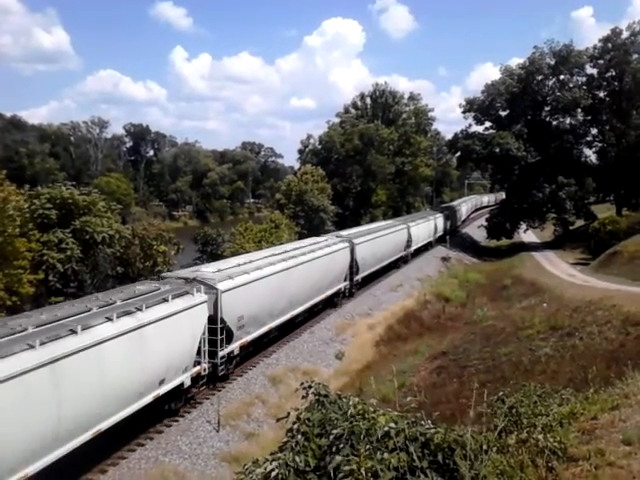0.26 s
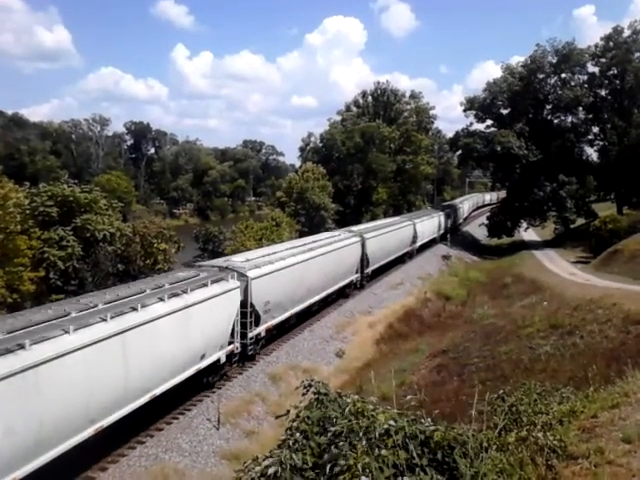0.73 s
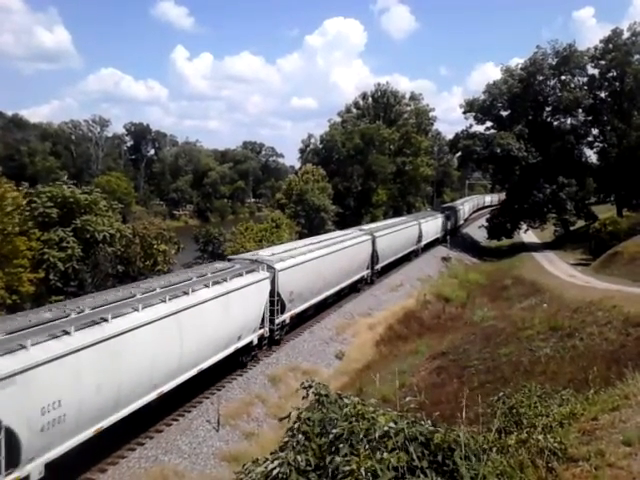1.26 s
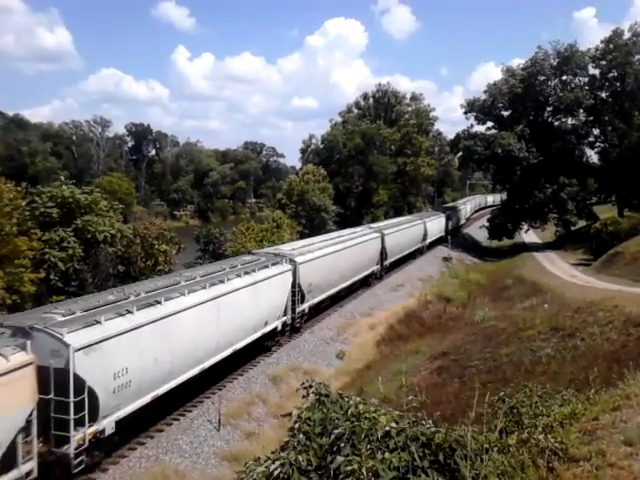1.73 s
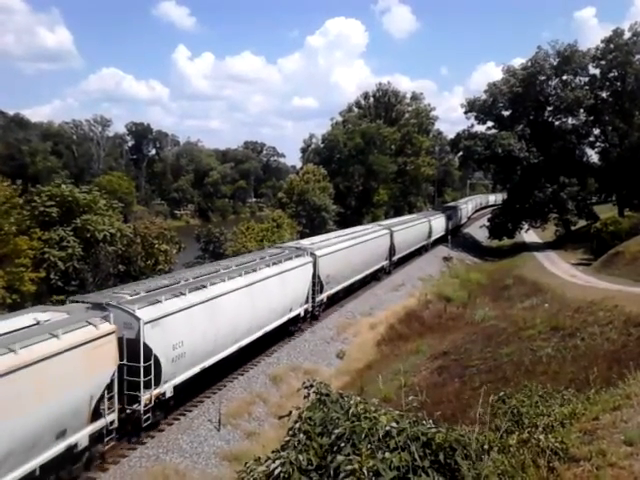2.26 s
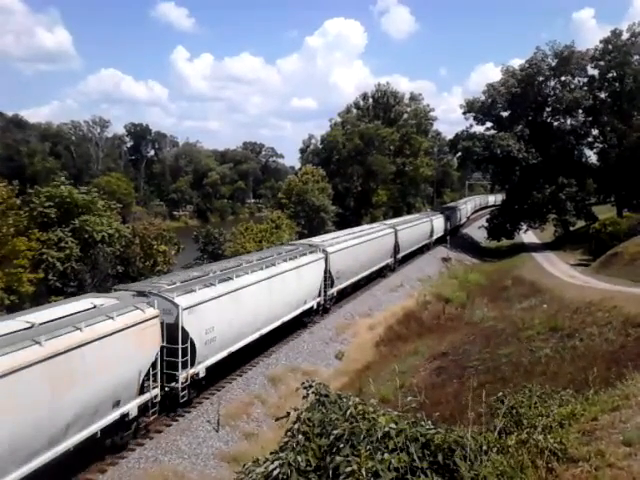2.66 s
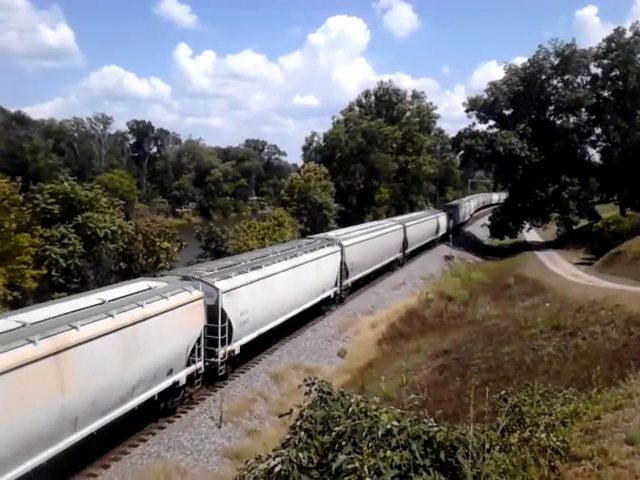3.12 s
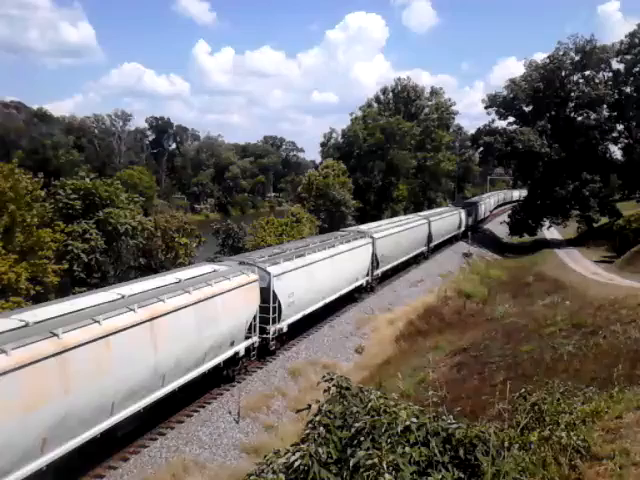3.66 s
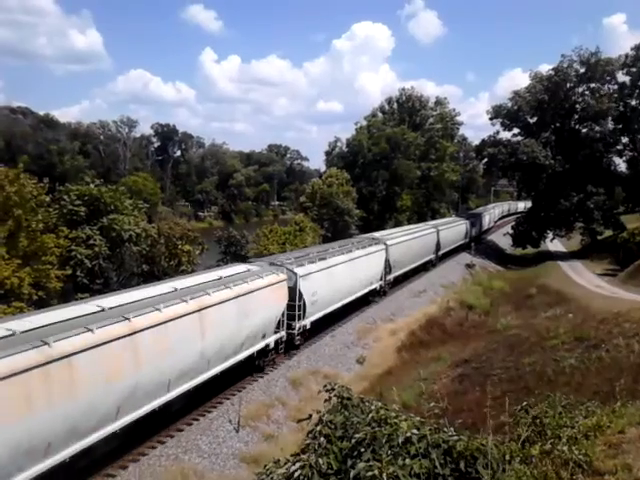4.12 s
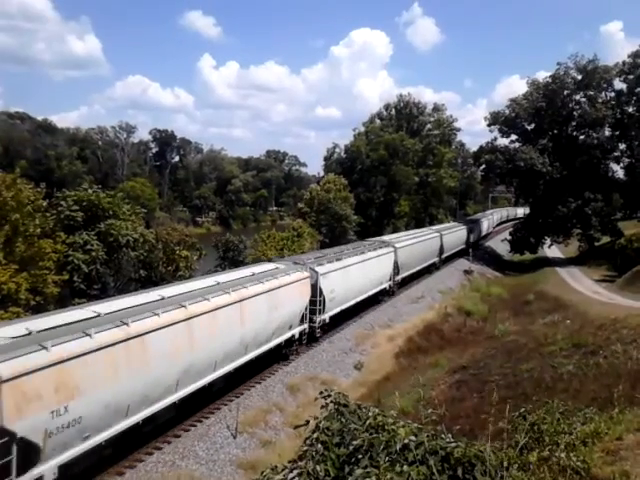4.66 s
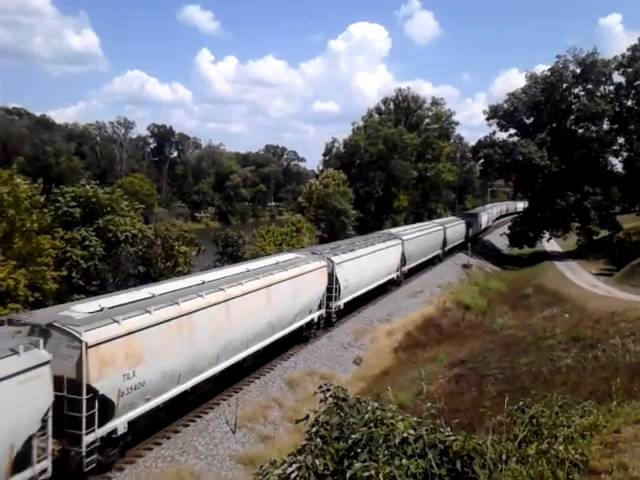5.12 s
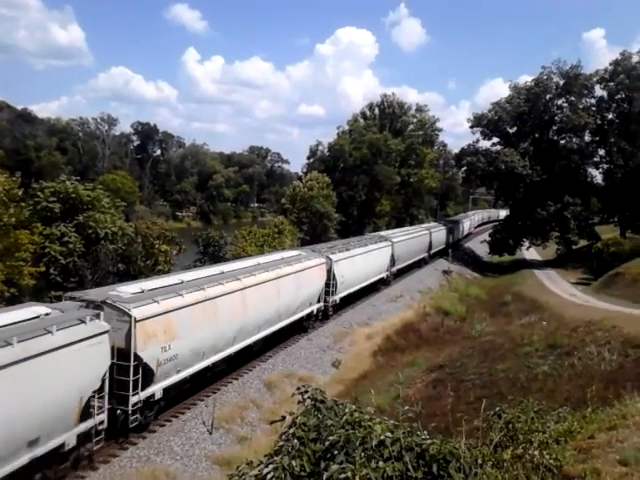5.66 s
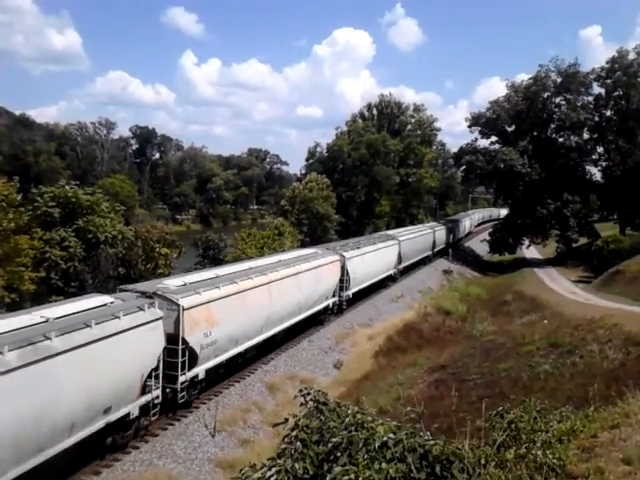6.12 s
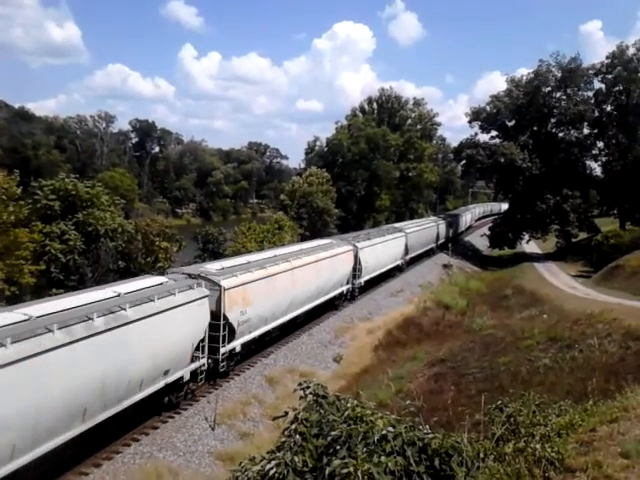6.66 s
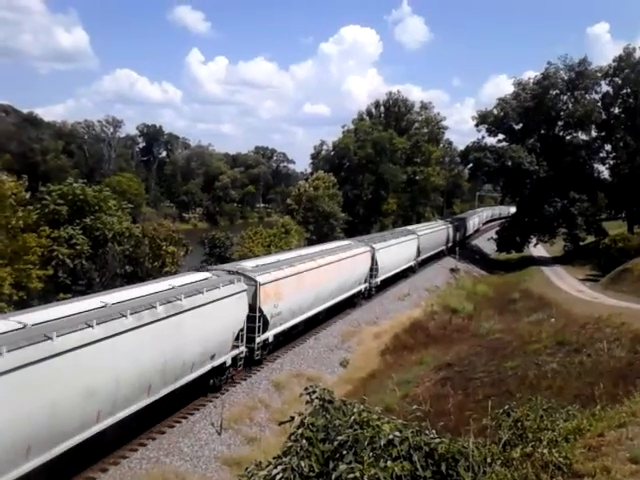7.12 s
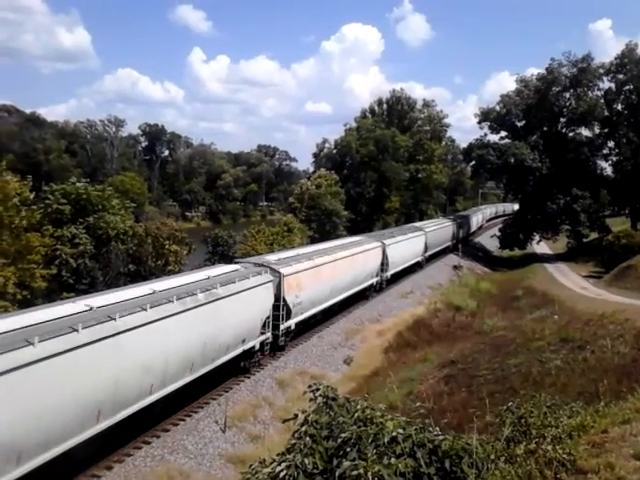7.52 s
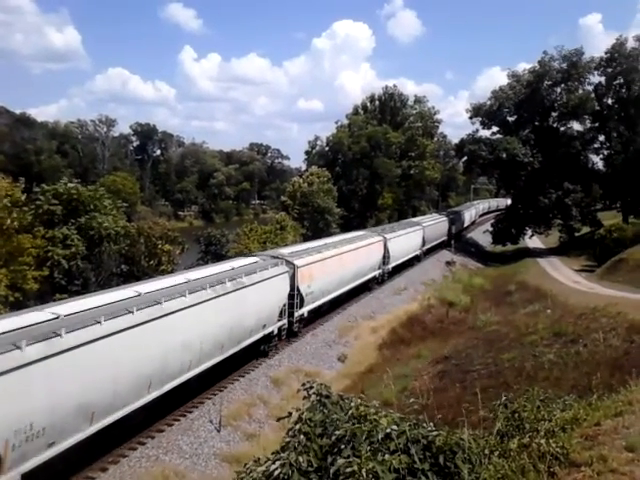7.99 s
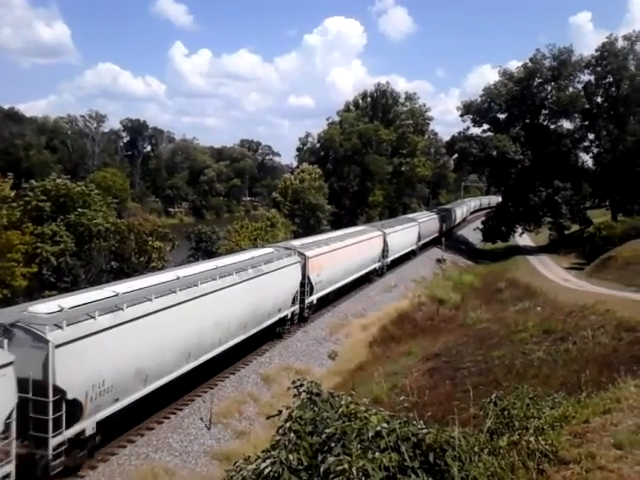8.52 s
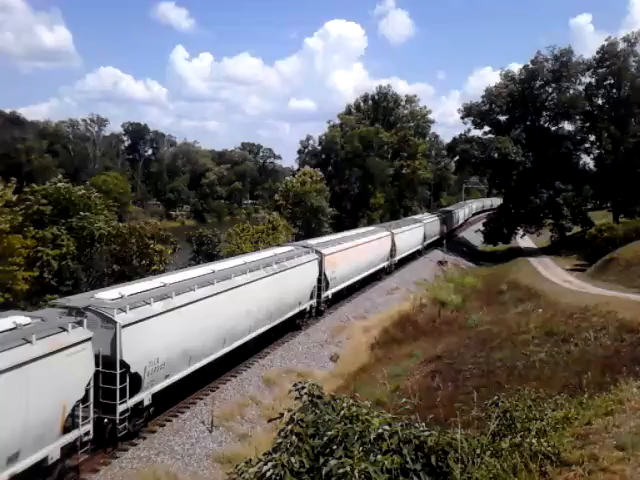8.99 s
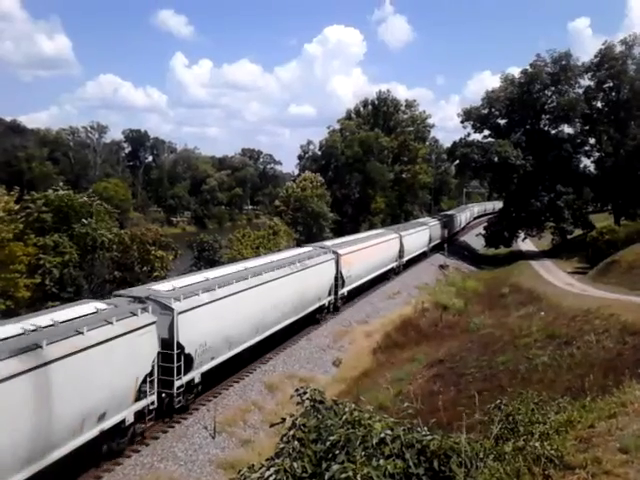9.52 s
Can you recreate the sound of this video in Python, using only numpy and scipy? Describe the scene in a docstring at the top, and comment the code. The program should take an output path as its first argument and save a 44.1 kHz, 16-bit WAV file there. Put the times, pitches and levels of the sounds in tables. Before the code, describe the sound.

Outdoors beside a curved track, a long freight train passes steadily. Wheel flanges scrape the rail in rough bursts, with thin gliding squeals ringing inside the grinding. Beneath runs a low hollow boom, swelling about every two seconds, and a constant roar of wheels. Midway, wind thumps the microphone; later the screeching grows loudest, then falls away. The sound is narrow-band and slightly harsh.

```python
"""Wheel flanges grind on the rail in bursts as a freight train of covered hoppers rolls round a curve.
Friction noise rings the steel wheels, and now and then one mode locks into a gliding squeal.
Underneath, shaped noise makes a low boom that swells regularly, and the steady roar of the trucks.
Half way through, a gust buffets the microphone with single thumps; a shorter gust follows later.
A narrow-band recorder mirrors a little treble upwards and clips the highest peaks."""
import sys
import numpy as np
from scipy import signal
from scipy.fft import rfft, irfft, next_fast_len
from scipy.io import wavfile
from scipy.ndimage import uniform_filter1d, map_coordinates

SR = 44100
rng = np.random.default_rng(int(sys.argv[2]) if len(sys.argv) > 2 else 0)


def persist_wave(psi):
    """Save psi, clipped to +-1, as 16-bit WAV."""
    counts = np.round(np.clip(psi, -1, 1) * 32767).astype(np.int16)
    wavfile.write(sys.argv[1], SR, np.atleast_2d(counts).T)


N = 430416  # length in samples

# Bites of a flange into the rail. Each row: start in seconds, end in seconds, attack in seconds,
# first level in dB, last level in dB, treble share of the power in dB,
# nominal squeal of the main wheel mode in dB relative to the mean of the two levels.
BITES = [(0, .453, 0.0085, -20.5, -20, -3.5, -7.5), (0.458, .922, 0.11, -16.5, -20.5, -2.5, -8),
         (1.214, 1.738, 0.14, -13.5, -17, -2.5, -9.5), (1.914, 2.424, 0.12, -24.5, -31.5, -3, -13.5),
         (2.585, 2.815, 0.021, -18.5, -20.5, -5.5, -3.5), (3.234, 3.813, 0.15, -18.5, -25.5, -2.5, -19),
         (3.82, 4.102, .08, -19.5, -22.8, -3.2, -16), (4.306, 4.576, .145, -22, -21, -1.5, -15.5),
         (4.594, 4.94, .054, -18.5, -19.5, -2, -15), (5.681, 6.062, .23, -17.5, -15, -3.9, -12),
         (6.071, 6.912, .05, -18.5, -16, -4, -12.5), (6.904, 7.08, 0.063, -11, -17, -3.5, -3.5),
         (7.52, 8.288, .08, -14, -13.5, -4, -4), (8.27, 9.062, 0.11, -12, -11, -3, -17),
         (9.088, 9.498, .06, -18, -21, -4, -11.5)]
# Modes of the steel wheels. Each row: frequency in Hz, width in Hz, relative level in dB.
WHEEL_MODES = [(979, 31, -7.5), (1090, 36, -10.5), (1587, 26, -8), (1778, 9.7, -4), (1948, 72, -5.5),
               (2210, 33.5, 4), (2599, 33, -1), (2760, 51, 1), (3557, 52, -6.5), (3848, 55, -3.5),
               (4528, 68, 2.5), (5493, 87, -2), (6450, 39, -1)]


def amp(db):
    """Decibels to gain."""
    return 10 ** (np.asarray(db) / 20)


def unit(x):
    """Scale to rms 1."""
    return x / np.sqrt(np.mean(np.abs(x) ** 2) + 1e-20)


def along(points, hz):
    """Gain at hz, read between (Hz, dB) points on a log frequency axis."""
    point_hz, point_db = np.transpose(points)
    return amp(np.interp(np.log(hz + 1), np.log(point_hz + 1), point_db))


def curves(rows):
    """One value per sample for each column after the time in seconds."""
    seconds, *columns = np.transpose(rows)
    return [np.interp(np.arange(N) / SR, seconds, column) for column in columns]


def wobble(rate, size=N):
    """A smooth random curve through rate knots a second."""
    knots = rng.standard_normal(int(size * rate / SR) + 4)
    coarse = np.arange(0, size + 32, 32)  # every 32nd sample is enough for a slow curve
    values = map_coordinates(knots, [coarse * rate / SR], mode="mirror")
    return np.interp(np.arange(size), coarse, values)


def filtered(x, response):
    """Filter x by a gain that is a function of frequency."""
    m = next_fast_len(N + SR // 4)
    return irfft(rfft(x, m) * response(np.fft.rfftfreq(m, 1 / SR)), m)[:N]


def rush(spectrum, patchy_db):
    """Coloured noise of rms 1, patchy in time and frequency."""
    bins = signal.stft(rng.standard_normal(N), nperseg=2048)[2]
    patches = uniform_filter1d(rng.standard_normal(bins.shape), size=2, axis=0)
    patches = uniform_filter1d(patches, size=6, axis=1)
    noise = signal.istft(bins * amp(patchy_db * unit(patches)), nperseg=2048)[1][:N]
    return unit(filtered(noise, lambda hz: along(spectrum, hz)))


def ringing(modes, swell_db, drift):
    """Modes shaken by friction; each swells and drifts on its own as the contact patch wanders."""
    out = np.zeros(N)
    for hz, width, db in modes:
        radius = np.exp(-np.pi * abs(width) / SR)
        poles = [1, -2 * radius * np.cos(2 * np.pi * hz / SR), radius * radius]
        ring = signal.lfilter([1, 0, -1], poles, rng.standard_normal(N))
        # reading the ring at a wandering speed makes its pitch drift
        read_at = np.arange(N) + np.cumsum(drift * wobble(4))
        ring = np.interp(read_at, np.arange(N), ring)
        out += amp(db + swell_db * wobble(5)) * np.sqrt(abs(width)) * unit(ring)
    return unit(out)


def flange_power():
    """Friction power and its treble share: each bite swells, drifts and lets go, over light rubbing."""
    # Light rubbing of all the other wheels. Each row: time in seconds, level in dB.
    rub = [(0, -29.5), (3, -29.2), (4.3, -25.5), (5.5, -27), (7.3, -32.5), (9.76, -37.5)]
    rub_treble_db, release_db_per_s = -2, 110
    t = np.arange(N) / SR
    power = amp(curves(rub)[0]) ** 2
    treble = power * amp(rub_treble_db) ** 2
    for start, end, attack, first_db, last_db, treble_db, _ in BITES:
        level_db = np.interp(t, [start, end], [first_db, last_db])
        level_db = level_db - release_db_per_s * np.clip(t - end, 0, 1)
        bite = (np.clip((t - start) / attack, 0, 1) * amp(level_db)) ** 2
        power = power + bite
        treble = treble + bite * amp(treble_db) ** 2
    return power, treble / power


def grinding(power, treble_share, squeal):
    """Flanges scrape the rail head: raw friction plus ringing wheels, juddering as they grip and slip."""
    # Smooth part of the friction noise. Each row: frequency in Hz, relative density in dB per Hz.
    friction = [(300, -27.5), (600, -20.5), (850, -15.5), (1050, -12), (1300, -9.5), (1600, -6),
                (1900, 0.5), (2400, -2.5), (3000, -1), (4150, -3.5), (5300, -2.5), (6000, -5.5), (6500, -3),
                (7000, -13), (9000, -13)]
    raw = rush(friction, patchy_db=3.5)
    scrape = unit(raw + amp(-2.5) * ringing(WHEEL_MODES, swell_db=2.0, drift=.002))
    # split at 3200 Hz and rebalance as the treble share moves
    low = filtered(scrape, lambda hz: 1 / (1 + (hz / 3200) ** 8))
    high = scrape - low
    treble_share = np.clip(treble_share, .02, .95)
    low_part = np.sqrt(1 - treble_share) * unit(low) * amp(-0.88)
    scrape = low_part + np.sqrt(treble_share) * unit(high) * amp(0.25)
    # a locked mode takes its power out of the broad friction noise, half of it at most
    taken = uniform_filter1d(squeal ** 2, size=SR // 8) / power
    judder = amp(0.49 * wobble(22))
    return judder * np.sqrt(power * np.clip(1 - taken, .5, 1)) * scrape


def main_squeals():
    """Every bite sets off the main wheel mode, half way through its attack; harder squeals are flatter."""
    main_hz, at_db, flatter_hz_per_db, glide_hz = 2249, -26, 3.5, -20  # main_hz is the pitch at at_db
    rows = []
    for start, end, attack, first_db, last_db, _, squeal_db in BITES:
        db = (first_db + last_db) / 2 + squeal_db
        hz = main_hz - flatter_hz_per_db * (db - at_db)
        rows.append((start + attack / 2, end, hz, glide_hz, db))
    return rows


def faint_squeals(power):
    """Other wheels catch briefly on one of their modes, louder while the grinding is loud."""
    count, mean_s, faint_db = 26, .3, -15.5  # faint_db is relative to grinding and mode level
    detune = .008  # largest mistuning from wheel to wheel, and largest glide, as a fraction of the pitch
    rows = []
    for k, (when, which, length, tune, bend) in enumerate(rng.random((count, 5))):
        # one squeal at a random moment in each equal slice of time
        start = (k + when) / count * (N - 1) / SR
        end = start + mean_s * (.5 + length)
        mode_hz, _, mode_db = WHEEL_MODES[int(which * len(WHEEL_MODES))]
        hz = mode_hz * (1 + detune * (2 * tune - 1))
        glide_hz = mode_hz * detune * (2 * bend - 1)
        grind_db = 10 * np.log10(power[int(start * SR):int(end * SR)].mean())
        rows.append((start, end, hz, glide_hz, grind_db + mode_db + faint_db))
    return rows


def squeals(rows):
    """Tones build, glide steadily in pitch and ring out, rough from slip and moving-car scatter."""
    attack_s, t60_s = 0.029, 0.5  # build-up time constant, and time to ring down by 60 dB
    out = np.zeros(N + SR)
    for start, end, hz, glide_hz, db in rows:
        held_s = end - start
        n = int(held_s * SR) + SR // 2
        t = np.arange(n) / SR
        ring_out = amp(-60 * np.maximum(t - held_s, 0) / t60_s)
        swell = (1 - np.exp(-t / attack_s)) * ring_out
        # a loud tone is firmly locked; a weak one slips about
        slip_hz = np.interp(db, [-30, -16], [30, 10])
        pitch = np.interp(t, [0, held_s], [hz, hz + glide_hz])
        pitch = pitch + slip_hz * wobble(149.3, size=n) + 4 * wobble(12.24, size=n)
        scatter = 1 + .62 * (wobble(60, size=n) + 1j * wobble(60, size=n))
        tone = unit(np.real(scatter * np.exp(2j * np.pi * np.cumsum(pitch) / SR)))
        out[max(0, round(start * SR)):][:n] += amp(db - 1.9) * swell * tone
    return out[:N]


def rolling():
    """Hollow car bodies boom, swelling at regular intervals, over the steady roar of the trucks."""
    # Colour of the boom. Each row: frequency in Hz, relative density in dB per Hz.
    boom_colour = [(15, -29.5), (30, -10), (55, -7.5), (72, -5), (83, 2.5), (100, -6), (150, -13),
                   (205, -9), (260, -16.5), (500, -30.5), (1000, -46.5)]
    # Colour of the truck roar. Each row: frequency in Hz, relative density in dB per Hz.
    truck_colour = [(100, -27.5), (220, -7.5), (340, 0), (520, -5), (750, -5), (950, -6), (1400, -7),
                    (2500, -16.5), (7000, -17)]
    boom_db, swell_db = -33.5, 3.5
    first_s, every_s, width_s = .04, 1.91, 0.069  # timing of the swells
    from_swell = (np.arange(N) / SR - first_s + every_s / 2) % every_s - every_s / 2
    level_db = boom_db + swell_db * np.exp(-(from_swell / width_s) ** 2)
    boom = amp(level_db + 1.3 * wobble(7)) * rush(boom_colour, patchy_db=1.0)
    roar = amp(-34.0 + 0.57 * wobble(7.6)) * rush(truck_colour, patchy_db=3.0)
    return boom + roar


def wind():
    """Lumpy buffeting, with single eddies that push and pull the diaphragm and quickly die away."""
    # Gusts on the microphone. Each row: peak time in seconds, half width in seconds, level in dB.
    gust_rows = [(4.7, 0.47, -29.5), (8.0, .23, -30.5)]
    # Colour of the buffeting. Each row: frequency in Hz, relative density in dB per Hz.
    buffet_colour = [(12, -14), (40, 5), (120, -2.5), (200, -1), (350, -19), (700, -22), (1500, -49)]
    # Eddies that thump the microphone. Each row: start in seconds, peak in dB, nominal frequency in Hz.
    thumps = [(3.052, -18.5, 133), (4.472, -13, 119), (4.53, -13, 190), (4.616, -8.5, 260),
              (4.643, -17, 108), (4.652, -7, 170), (4.742, -7.5, 176), (4.75, -11, 130), (5.062, -8.5, 187)]
    breeze_db = -50  # the air between the gusts
    t = np.arange(N) / SR
    gusts = sum(amp(db) * np.exp(-((t - s) / width) ** 2) for s, width, db in gust_rows)
    level = np.hypot(amp(breeze_db), gusts)
    out = level * amp(2.2 * wobble(22)) * rush(buffet_colour, patchy_db=2.5)
    t = np.arange(SR // 10) / SR
    for s, db, hz in thumps:
        u = 2 * np.pi * hz * t
        push_pull = u ** 3 * (2 - u / 2) * np.exp(-u)
        flutter = .5 * u * np.sin(2 * u) * np.exp(-u / 2)
        push = push_pull + flutter
        out[round(s * SR):][:len(t)] -= amp(db) * push / np.abs(push).max()
    return out


def dull_swells():
    """Dull low-mid noise, strongest around 800 Hz, swells and fades in smooth humps."""
    # Single swells. Each row: start in seconds, length in seconds, level in dB at the top of the hump.
    swell_rows = [(1.286, 0.22, -32), (4.173, 0.17, -30.5), (4.613, 0.34, -33.5), (8.55, 0.81, -33.5)]
    # Colour of the dull noise. Each row: frequency in Hz, relative density in dB per Hz.
    dull_colour = [(200, -29), (450, -6), (800, 4), (1100, -3), (1600, -10), (4000, -37)]
    level = np.zeros(N)
    for start, length, db in swell_rows:
        n = int(length * SR)
        level[round(start * SR):][:n] += amp(db) * signal.windows.hann(n)
    return level * rush(dull_colour, patchy_db=1.2)


def chafing():
    """Another, lightly loaded wheelset sings softly between two bursts as friction shakes its modes."""
    # Loudness of the singing. Each row: time in seconds, level in dB before a 1 dB lift.
    chafe_level = [(4.95, -59), (5.15, -32.5), (5.3, -31.5), (5.6, -36), (5.8, -53)]
    # Modes of this wheelset. Each row: frequency in Hz, width in Hz, relative level in dB.
    chafe_modes = [(1750, 140, -5), (2570, 230, -13), (3330, 190, -2.5), (3530, 71, -1), (4350, 85, 0.5),
                   (5390, 57, -4), (5600, 50, 3.5), (6200, 57, -9.5), (7300, 100, -11)]
    level_db, = curves(chafe_level)
    return amp(level_db + 1) * ringing(chafe_modes, swell_db=2.5, drift=.005)


def scene():
    """Train and wind at one microphone."""
    # Single squeals, loud and soft, each with its own pitch and glide. Each row: start in seconds,
    # end in seconds, pitch in Hz, glide in Hz, nominal level in dB.
    single_squeals = [(.52, .945, 4550, 19.5, -26), (.964, 1.116, 3880, -6, -39),
                      (2.0, 2.48, 1757, 17.5, -36.5), (2.59, 2.779, 1118, 95, -32),
                      (2.595, 2.82, 4470, 49.5, -31.5), (3.3, 3.68, 2800, -30, -30),
                      (3.832, 4.145, 955, 11.5, -33), (4.36, 4.62, 3480, 12.5, -30.5),
                      (5.37, 5.545, 1866, 9, -34), (5.38, 5.635, 6240, -69.5, -36.5),
                      (6.0, 6.795, 2735, 38.5, -24), (6.872, 7.07, 1044, -50, -31),
                      (6.878, 7.056, 2616, 32, -26.5), (7.568, 7.742, 2745, 23.5, -24.5),
                      (8.25, 8.56, 2776, -18.5, -18.5), (8.3, 8.655, 4490, 70.5, -23),
                      (8.4, 9.121, 3600, -22, -24), (8.65, 8.956, 5350, 60.5, -21.5),
                      (8.82, 8.96, 2790, -20, -17.5), (8.86, 8.97, 4500, -25, -16),
                      (9.1, 9.276, 2160, 96, -27), (9.276, 9.373, 1330, 169, -29),
                      (9.375, 9.493, 1577, 63.5, -30.5)]
    power, treble_share = flange_power()
    squeal = squeals(main_squeals() + list(single_squeals) + faint_squeals(power))
    train = grinding(power, treble_share, squeal) + squeal + chafing() + rolling()
    return (train + dull_swells() + wind())[None]


def record(dry):
    """A narrow-band recorder: its slow clock mirrors a little treble upwards, and the highest peaks clip."""
    band_hz, clock_hz, top_hz, ceiling = 7560, 16000, 15800, .75
    x = filtered(dry[0], lambda hz: 1 / (1 + (hz / band_hz) ** 160))
    mirror = x * np.cos(2 * np.pi * clock_hz * np.arange(N) / SR)
    mirror_gain = [(8450, -7), (8800, -20.5), (9300, -53), (10000, -100)]  # (Hz, dB)
    x = x + filtered(mirror, lambda hz: along(mirror_gain, hz))
    clipped = np.clip(x, -ceiling, ceiling)
    return filtered(clipped, lambda hz: hz < top_hz)[None]


dry = scene()
out = record(dry)
persist_wave(out)
```